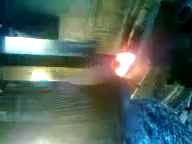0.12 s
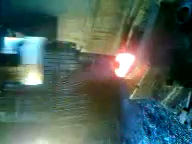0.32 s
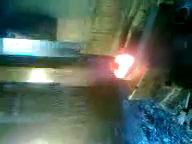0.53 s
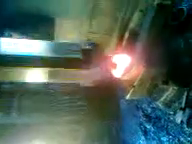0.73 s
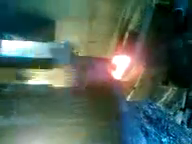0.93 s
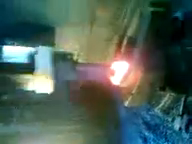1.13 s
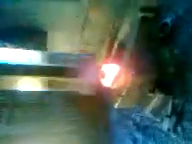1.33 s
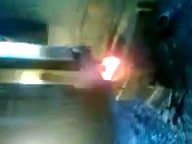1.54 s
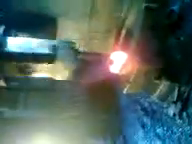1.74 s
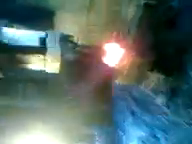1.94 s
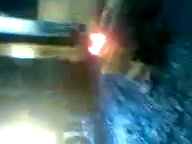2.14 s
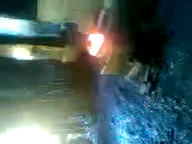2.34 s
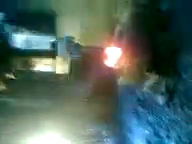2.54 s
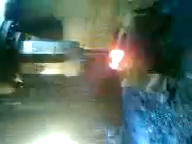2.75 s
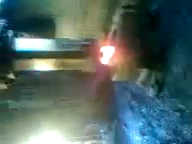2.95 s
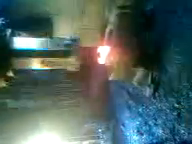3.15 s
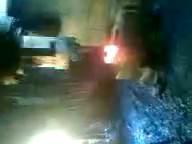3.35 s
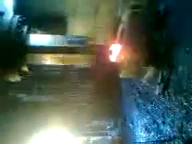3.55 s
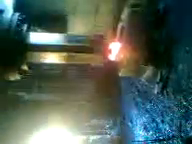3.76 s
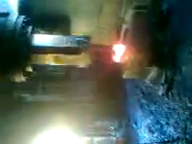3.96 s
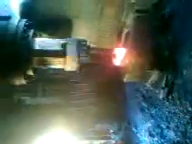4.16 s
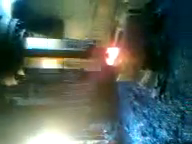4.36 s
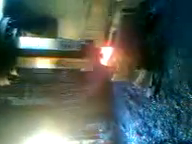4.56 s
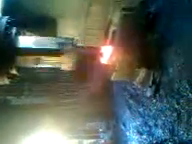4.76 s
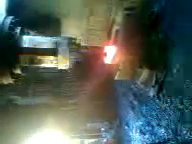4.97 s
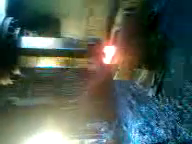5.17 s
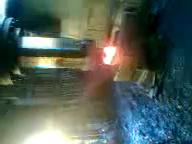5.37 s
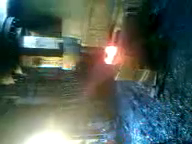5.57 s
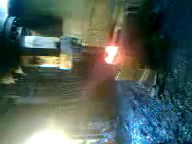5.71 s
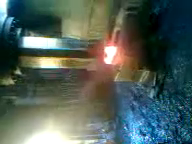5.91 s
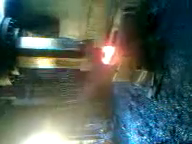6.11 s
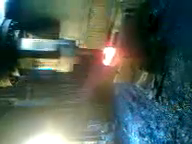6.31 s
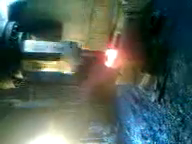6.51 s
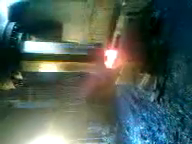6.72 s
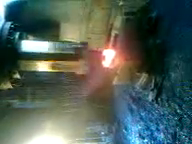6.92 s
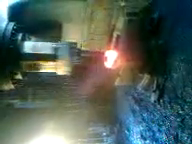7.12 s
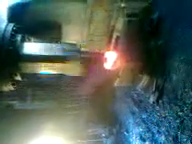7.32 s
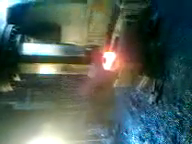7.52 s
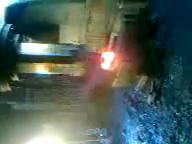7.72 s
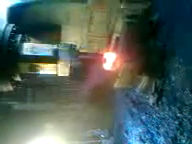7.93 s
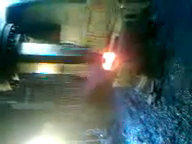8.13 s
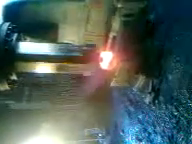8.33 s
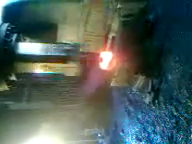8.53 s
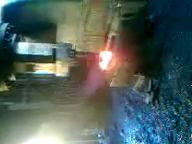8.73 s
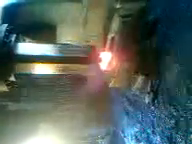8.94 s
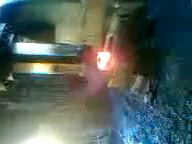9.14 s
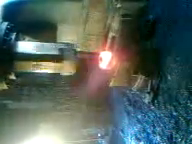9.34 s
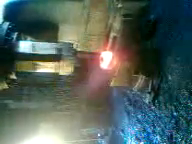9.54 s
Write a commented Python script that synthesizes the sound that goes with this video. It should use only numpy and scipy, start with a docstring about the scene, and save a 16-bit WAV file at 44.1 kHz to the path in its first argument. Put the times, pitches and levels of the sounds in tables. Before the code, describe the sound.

A power hammer pounds hot metal in steady, harsh crunching blows, each followed by a short steel ring and workshop echo.

```python
"""Power hammer in a workshop

Machinery rushes and loose iron clanks, then a hammer hits a glowing bar every three quarters of a
second. Each blow is a harsh crunch that sinks in pitch and stops as the ram (the moving weight) lifts.
Ram and anvil ring on over the echo of the room. The first blows sound loudest and brightest.
All is heard through a small microphone that misses deep bass and high treble."""
import sys
import numpy as np
from scipy import signal
from scipy.fft import rfft, irfft, next_fast_len
from scipy.io import wavfile

SR = 44100
rng = np.random.default_rng(int(sys.argv[2]) if len(sys.argv) > 2 else 0)


def store_wav(level_fs):
    """Save 16-bit WAV to argv[1]."""
    pcm = np.round(np.clip(np.atleast_2d(level_fs), -1, 1) * 32767)
    wavfile.write(sys.argv[1], SR, pcm.T.astype(np.int16))


N = 422478
TIME = np.arange(N) / SR
TOP_HZ = 4500  # upper limit of the noises and the microphone

# How loud the background rush sounds, strong at first and faint after two seconds: time_s, level_db
RUSH_LEVELS = [(0, -29.3), (0.7, -31.8), (1.45, -38), (1.95, -50.3), (9.58, -51.5)]
# Knocks of loose iron: start_s, level_db
CLANKS = [(0.08, -16.5), (0.119, -18), (0.167, -28), (0.329, -23.5), (0.445, -29)]
# Hammer blows: start_s, contact_s, tail_db, hum_db, ping_db
# Tail is how much louder than usual the ring and echo sound; hum and ping are the low and high ring.
BLOWS = [(0.74, 0.08, 9.5, -38.5, -40), (1.497, 0.112, -0.3, -47, -41), (2.258, 0.11, -1.8, -48.5, -45.5),
         (3.036, 0.095, -1.4, -37.5, -38.5), (3.787, 0.05, 0.7, -37, -39.5),
         (4.542, 0.12, -0.3, -42, -28.7), (5.296, 0.104, -0.8, -34, -37.2), (6.066, 0.14, -0.7, -27, -39),
         (6.822, 0.085, 0.7, -27.5, -49), (7.568, 0.124, 1.0, -27, -42), (8.321, 0.066, 1.2, -27.5, -45),
         (9.08, 0.11, 0.9, -30.3, -32)]
# Levels that step down after the first blows: before_db, after_db, midpoint_s, width_s
CRUNCH_STEP = (-10.2, -12.4, 2.0, 0.1)
CRACK_STEP = (-12.7, -19.8, 1.9, 0.28)
CHIME_STEP = (-44.5, -57.5, 2.9, 0.2)
# Tones of ram and anvil, each with a close twin: pitch_hz, level_db, fade_s, twin_offset_hz, twin_db
STEEL_TONES = [(368.5, 5.5, 1.94, 5.1, -6.5), (377, -6.5, 3.1, -19, 2), (443, -6.5, 1.4, 40, 0),
               (549, -5.5, 2.1, 8, -3), (787, 3.5, 1.65, 8, 4.5), (797, -2.5, 1.6, -24, 3.5),
               (818, -3.5, 2.4, 44.5, 1.5), (1840, 8.7, 2.3, 10.5, -4), (1900, -15, 1.0, 31, 3),
               (2588, -6.5, 3.6, 12, 1), (3055, 7.5, 1.7, 9, -2.5), (3060, 3.5, 1.5, -37.5, 1.5)]
# Four pitch ranges of the ring: hum_hz, middle_hz, ping_hz, chime_hz
RING_RANGES = [367, 775, 1837, 3057]
# How strong each noise is from bass to treble: pitch_hz, level_db
MACHINERY_COLOUR = [(30, -19), (100, -13), (220, -10), (295, 3), (340, 1), (550, -1), (1100, -7.5),
                    (1700, -1.5), (2600, -5), (3200, -9.5), (4000, -13.5)]
CLANK_COLOUR = [(60, -13), (250, -8.5), (420, -3), (850, 0.5), (1300, 1), (1700, -24.5), (2500, -3.5),
                (3200, -6.5), (4000, -16)]
THUD_COLOUR = [(25, -37), (55, -22), (90, -18), (140, -13), (240, 0.5), (380, 3), (600, 4), (1200, -28)]
CRACK_COLOUR = [(300, -15), (700, 0), (1100, 1), (1450, -1.5), (1900, 1), (2500, -6.5), (3200, -6),
                (4000, -14)]
ECHO_COLOUR = [(30, -20), (100, -11.5), (200, -9.5), (360, 4), (600, 1.5), (850, 1.5), (1300, -6),
               (2000, -1), (2600, -6.5), (3200, -7.5), (4000, -12.5)]


def from_db(db):
    """Turn decibels into a number to multiply a sound by."""
    return 10 ** (np.asarray(db) / 20)


def unit_level(x):
    """Scale a sound so its average strength (rms) is 1."""
    return x / np.sqrt(np.mean(x ** 2) + 1e-20)


def keep_side(x, hz, side, order=2):
    """Keep the "low" or "high" side of a pitch; a higher order cuts more sharply."""
    return signal.sosfilt(signal.butter(order, hz, side, fs=SR, output="sos"), x)


def noise(colour, ripple_db=0.0, spacing_hz=14):
    """Steady noise shaped by a colour table; the ripple stands for many close ringing tones."""
    hz, db = np.transpose(colour)
    size = next_fast_len(N)
    pitches = np.maximum(np.fft.rfftfreq(size, 1 / SR), 1)
    ripple = ripple_db * np.interp(pitches / spacing_hz, np.arange(1000), rng.standard_normal(1000))
    gain = from_db(np.interp(np.log(pitches), np.log(hz), db) + ripple)
    gain *= (pitches > 20) & (pitches < TOP_HZ)
    return unit_level(irfft(rfft(rng.standard_normal(size)) * gain)[:N])


def drift(rate_hz):
    """A random wobble of size about 1 that turns rate_hz times a second."""
    points = rng.standard_normal(int(N / SR * rate_hz) + 2)
    return unit_level(np.interp(TIME * rate_hz, np.arange(len(points)), points))


def add(track, start_s, sound):
    """Mix a sound into a track."""
    at = int(start_s * SR)
    track[at:at + len(sound)] += sound[:N - at]


def decay(age, rise_s, fade_s):
    """A loudness curve that swells, then drops 60 dB every fade_s."""
    return (1 - np.exp(-age / rise_s)) * from_db(-60 * age / fade_s)


def fall_away(age, after_s, over_s):
    """A curve that holds near 1, then sinks to 0 around after_s."""
    return 1 / (1 + np.exp((age - after_s) / over_s))


def step_level(step, time_s):
    """The level in dB at one moment of a smooth step."""
    before_db, after_db, midpoint_s, width_s = step
    return after_db + (before_db - after_db) * fall_away(time_s, midpoint_s, width_s)


def limit(x, ceiling):
    """Gently hold the swing of a sound under a ceiling."""
    swing = np.abs(signal.hilbert(x))
    return x / (1 + (swing / ceiling) ** 6) ** (1 / 6)


def sliding_filter(x, pitch_hz, width_hz, block=64):
    """Boost a sound around a moving pitch and dull what lies above it."""
    r = np.exp(-np.pi * width_hz / SR)
    out, state = np.zeros(len(x)), np.zeros(2)
    for i in range(0, len(x), block):
        angle = 2 * np.pi * pitch_hz[i] / SR
        feedback = [1, -2 * r * np.cos(angle), r * r]
        out[i:i + block], state = signal.lfilter([np.sin(angle)], feedback, x[i:i + block], zi=state)
    return unit_level(out)


def machinery(split_hz=1200, flutter_db=2.63, dip_db=-2, dip_s=0.07):
    """The rush of drive and belts sounds strong at first, then faint; it dips around each blow's start."""
    dips = sum(np.exp(-np.abs(start - TIME) / dip_s) for start, *_ in BLOWS)
    bass_db = np.interp(TIME, *np.transpose(RUSH_LEVELS)) + dip_db * dips
    treble_db = bass_db + 1 - TIME  # the treble dulls by 1 dB a second
    out = np.zeros(N)
    for side, level_db in (("low", bass_db), ("high", treble_db)):
        loudness = from_db(level_db + flutter_db * drift(25))
        out += loudness * unit_level(keep_side(noise(MACHINERY_COLOUR), split_hz, side))
    return out


def clanks():
    """Loose iron knocks, blurred by the room into short bursts of noise."""
    loudness = np.zeros(N)
    for start, level_db in CLANKS:
        add(loudness, start, from_db(level_db) * decay(TIME[:SR // 2], rise_s=0.0024, fade_s=0.21))
    return loudness * noise(CLANK_COLOUR) * from_db(1.6 * drift(200))


def crunch(start_hz=900, end_hz=440, width_hz=520, usual_contact_s=0.1):
    """The hammer's faces judder while the ram presses; the judder slows, breaks up and stops on lifting."""
    out, thud = np.zeros(N), noise(THUD_COLOUR)
    grit = noise(CRACK_COLOUR) * from_db(1.8 * drift(350))
    wander, lumps = np.exp(0.19 * drift(130)), np.minimum(drift(220), 0.5)
    age = TIME[:SR // 4]
    for start, contact_s, *_ in BLOWS:
        crunch_db, crack_db = step_level(CRUNCH_STEP, start), step_level(CRACK_STEP, start)
        here = int(start * SR) + np.arange(len(age))
        progress = np.minimum(age / contact_s, 1)
        pitch_hz = (start_hz + (end_hz - start_hz) * progress ** 1.57) * wander[here]
        pitch_hz *= (usual_contact_s / contact_s) ** 0.22  # a shorter blow sounds higher
        judder = sliding_filter(rng.standard_normal(len(age)), pitch_hz, width_hz)
        judder = sliding_filter(judder, pitch_hz, width_hz)
        body = unit_level(keep_side(judder, 350, "high"))
        # the heavy frame builds up a low thud during the stroke
        body += from_db(-21.5 + 9 * progress) * thud[here]
        pressing = (1 - np.exp(-(age / 0.0023) ** 2)) * fall_away(age, contact_s, 0.0015)
        breakup_db = 3 * (0.5 + progress) * lumps[here]
        body = unit_level(limit(body, 1)) * pressing * from_db(crunch_db - 3.42 + breakup_db)
        # a gritty crack as the faces meet the bar's crust, fading as the ram slows
        crack = grit[here] * from_db(crack_db + 3) * decay(age, rise_s=0.003, fade_s=0.32)
        crack *= fall_away(age, 0.93 * contact_s, 0.023)
        add(out, start, limit(body + crack, from_db(crunch_db + 7)))
    return out


def ring_strength(hz, start, tail_db, hum_db, ping_db):
    """Level and length of one tone after a blow; a stronger hum or ping lasts longer."""
    levels_db = [hum_db, -39 + tail_db, ping_db + tail_db, step_level(CHIME_STEP, start)]
    holds_s = [0.425 + 0.007 * (hum_db + 40), 0.425, 0.42 + 0.018 * (ping_db + 40), 0.38]
    return np.interp(np.log(hz), np.log(RING_RANGES), levels_db), np.interp(hz, RING_RANGES, holds_s)


def steel_ring(shimmer_db=3.16, swell_db=0.7, twin_fade_s=3.3):
    """Each blow rings the same tones of ram and anvil with its own strengths; they hold, then break off."""
    out, age = np.zeros(N), TIME[:SR]
    for hz, tone_db, fade_s, offset_hz, twin_db in STEEL_TONES:
        tone = np.zeros(N)
        for start, _, tail_db, hum_db, ping_db in BLOWS:
            level_db, hold_s = ring_strength(hz, start, tail_db, hum_db, ping_db)
            twin_hz = hz + offset_hz * (1 + 0.044 * rng.standard_normal())
            # two close tones throb together; the twin fades faster
            twin = from_db(twin_db - 60 * age / twin_fade_s) * np.sin(2 * np.pi * twin_hz * age)
            pair = np.sin(2 * np.pi * hz * age) + twin
            loudness = decay(age, 0.055, fade_s) * fall_away(age, hold_s, 0.02)
            add(tone, start, from_db(level_db + tone_db) * pair * loudness)
        out += tone * from_db(shimmer_db * drift(50) + swell_db * drift(12))
    return out


def room_echo(split_hz=1100):
    """The room and the iron frame's countless tones die away after each blow; the treble goes first."""
    bass, treble, age = np.zeros(N), np.zeros(N), TIME[:SR]
    bass_tail = decay(age, rise_s=0.03, fade_s=1.42) * fall_away(age, 0.46, 0.06)
    treble_tail = decay(age, rise_s=0.03, fade_s=1.1) * fall_away(age, 0.39, 0.095)
    for start, _, tail_db, *_ in BLOWS:
        add(bass, start, from_db(tail_db - 20.7) * bass_tail)
        add(treble, start, from_db(tail_db - 21.2) * treble_tail)
    dull = keep_side(noise(ECHO_COLOUR, ripple_db=1.5), split_hz, "low")
    bright = keep_side(noise(ECHO_COLOUR, ripple_db=3.0), split_hz, "high")
    return (bass * dull + treble * bright) * from_db(1.3 * drift(50))


def scene():
    """Hammer, room and machinery together in one channel."""
    hammer = crunch() + steel_ring() + room_echo()
    return (hammer + machinery() + clanks())[None, :]


def record(dry, bass_cut_hz=64, treble_cut_hz=3300, ceiling=0.714):
    """The small microphone loses deep bass and high treble; peaks over its ceiling clip and crackle."""
    narrow = keep_side(dry, bass_cut_hz, "high")
    narrow = keep_side(narrow, treble_cut_hz, "low", order=10)
    narrow = keep_side(narrow, TOP_HZ, "low", order=14)
    clipped = np.clip(narrow, -ceiling, ceiling)
    steep_cut = signal.ellip(10, 0.1, 90, 16000, fs=SR, output="sos")  # removes crackle above 16000 Hz
    return signal.sosfilt(steep_cut, clipped)


dry = scene()
out = record(dry)
store_wav(out)
```